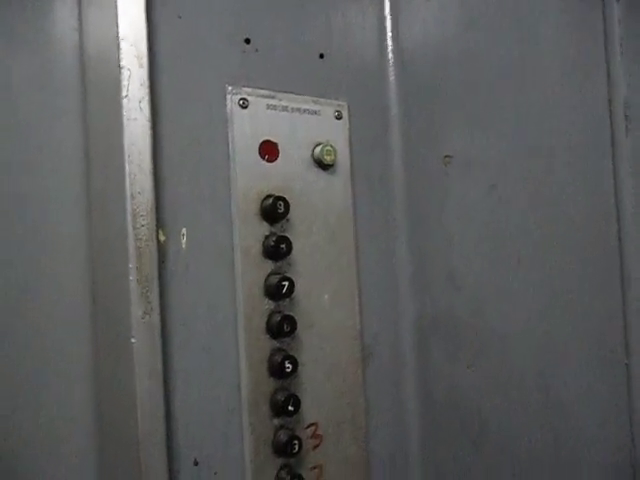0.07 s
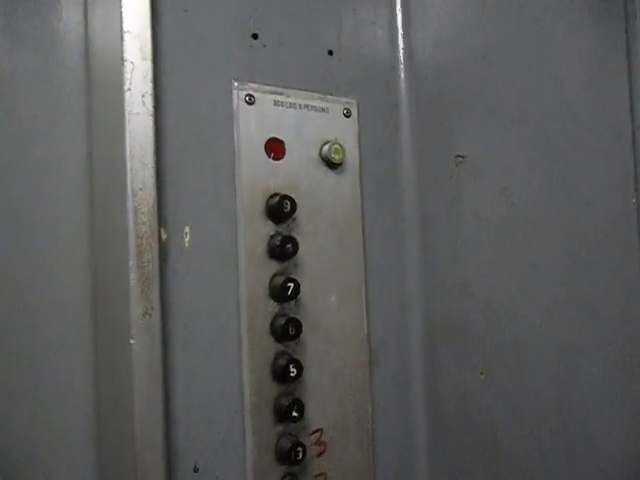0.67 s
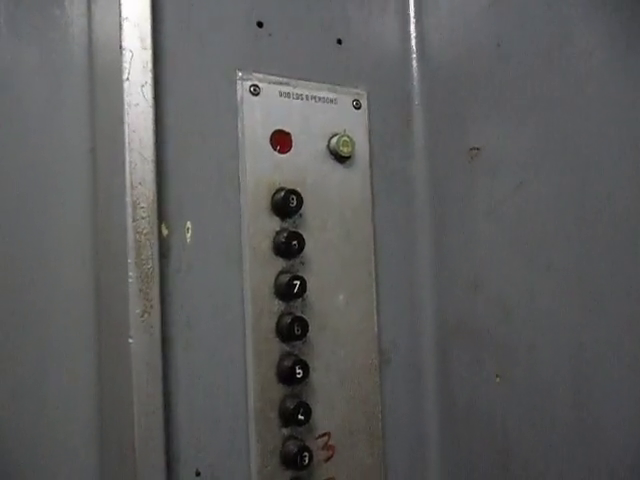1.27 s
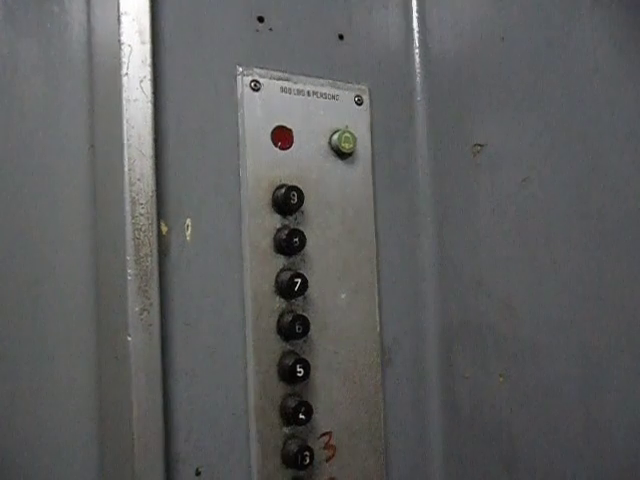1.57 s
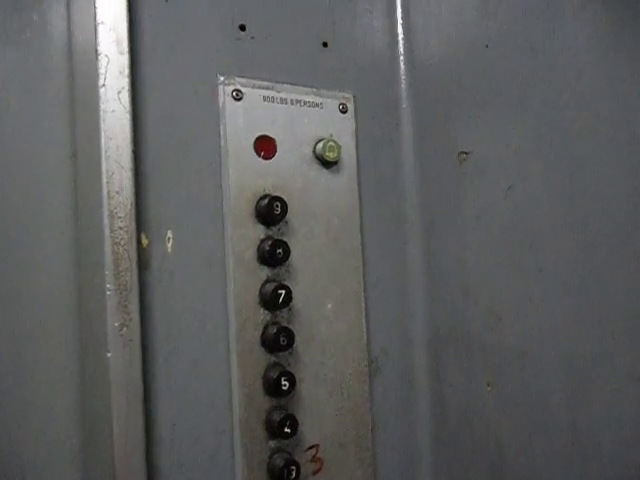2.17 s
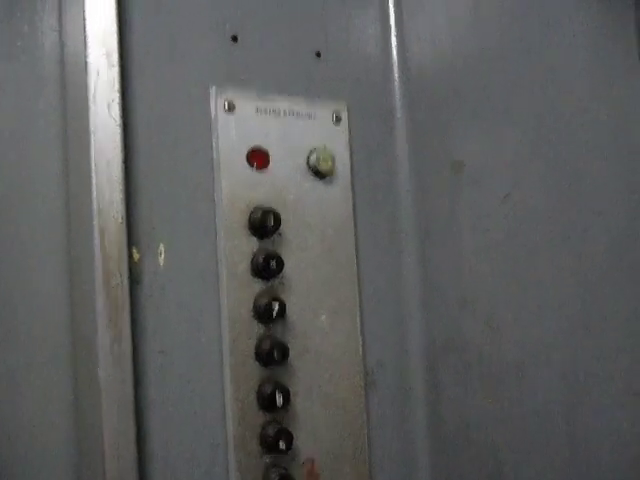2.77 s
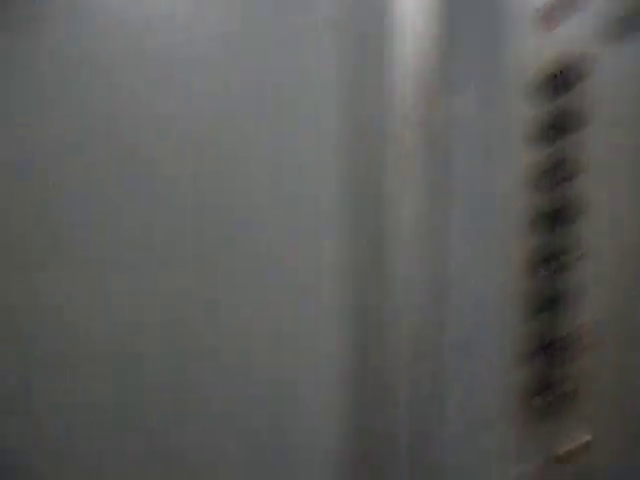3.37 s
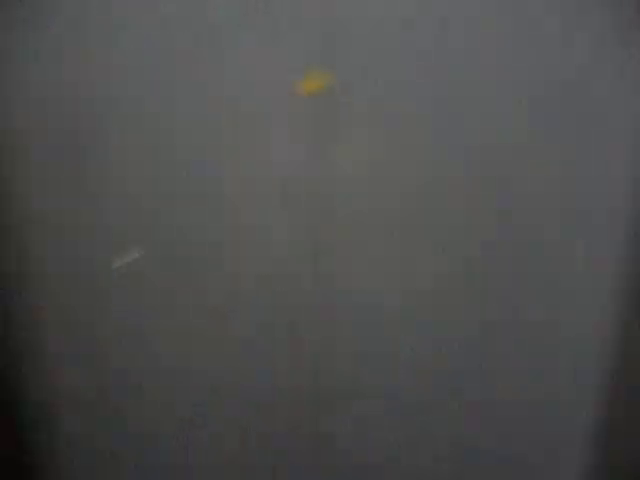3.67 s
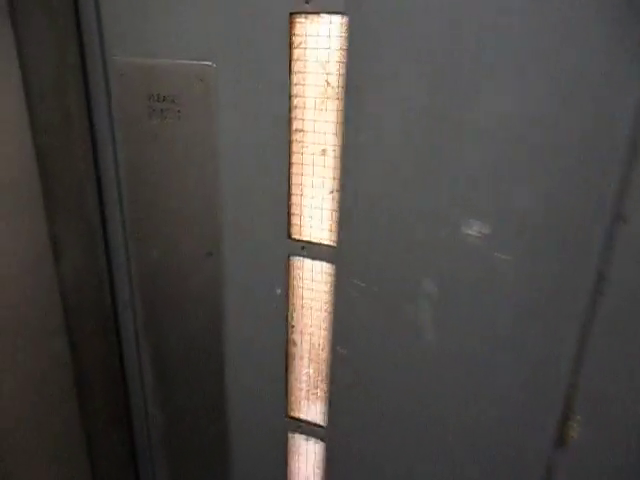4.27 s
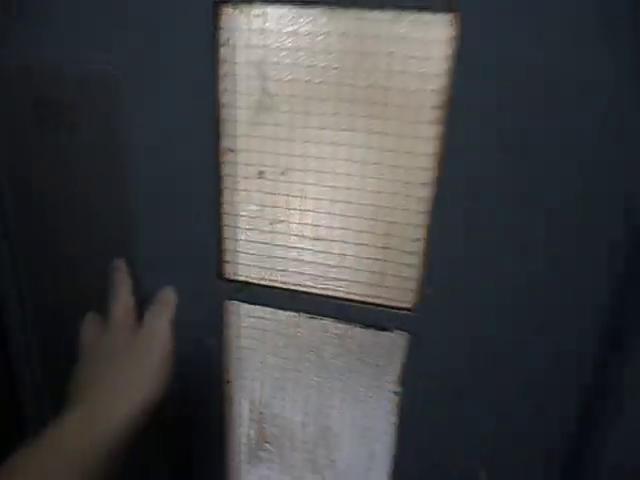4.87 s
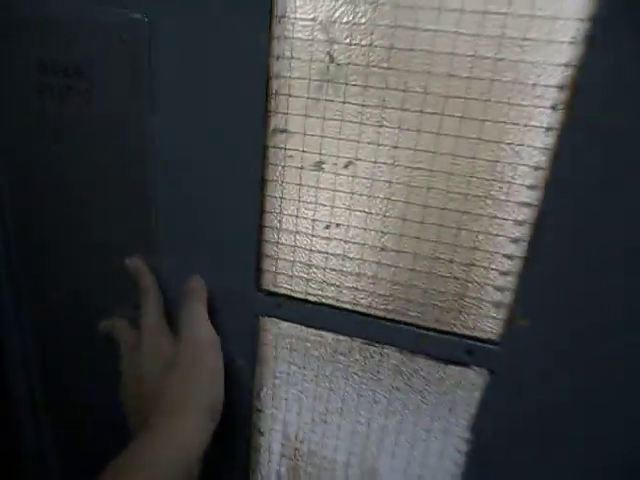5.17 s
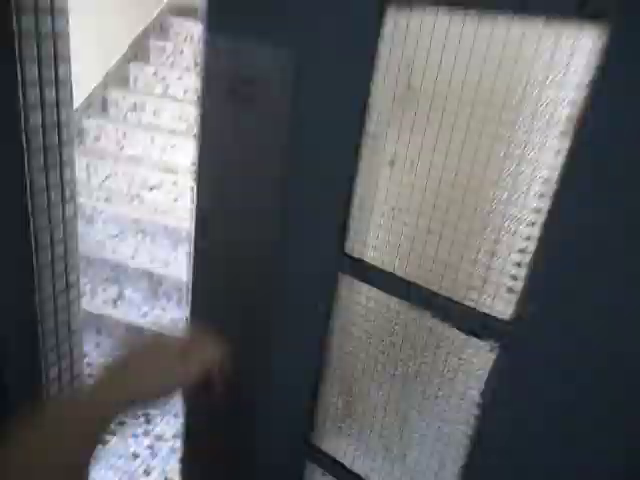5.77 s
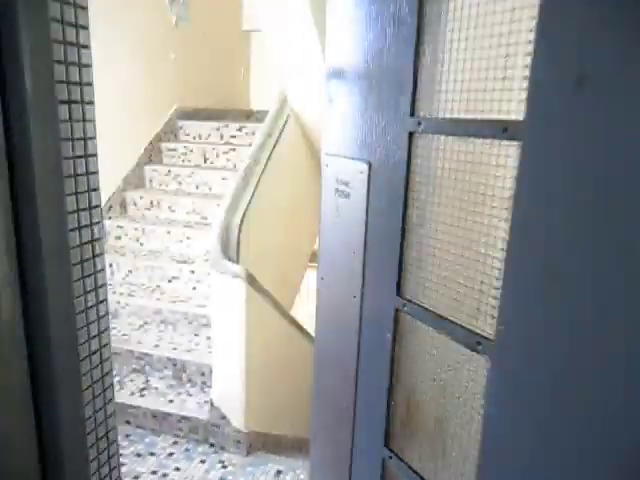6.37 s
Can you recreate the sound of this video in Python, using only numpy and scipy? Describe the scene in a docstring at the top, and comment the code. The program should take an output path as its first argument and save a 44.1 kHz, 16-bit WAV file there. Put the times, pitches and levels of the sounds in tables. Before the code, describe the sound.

Inside a narrow old steel lift, a distant motor hums low and wavering over a soft rush of air. The car stops with a dull bump and small metallic clinks. The inner door rolls open, rumbling and rattling louder, with knocks and a ringing ping. Then the outer door's catch lets go with a sharp, booming clack and the door shudders open onto a stairwell. A small microphone hears it closely from mid-cabin.

```python
"""The inner door of an old steel lift rolls open at close range, heard from the middle of the cabin.
First the winding motor hums, the car stops and the door gear unlocks with small clinks. Rollers then
bump along the worn track, shaking panels and loose fittings, and the run ends with a ping. The outer
door's catch lets go with a sharp clack and its leaf shudders open on the air of a stairwell.
The narrow cabin booms at its resonances; one small microphone dulls the highest treble."""
import sys
import numpy as np
from scipy import signal
from scipy.fft import rfft, irfft, next_fast_len
from scipy.io import wavfile
from scipy.ndimage import map_coordinates

SR = 44100
rng = np.random.default_rng(int(sys.argv[2]) if len(sys.argv) > 2 else 0)


def put_to_file(sound):
    """Save the sound as 16-bit audio at rate SR, in the file named by the first command-line argument."""
    columns = np.atleast_2d(sound).T  # one column per channel
    safe = np.clip(columns, -1, 1)
    whole_steps = np.round(safe * 32767)
    wavfile.write(sys.argv[1], SR, whole_steps.astype(np.int16))


N = 287532
TIME = np.arange(N) / SR

# spectrum of loose fittings chattering: f/Hz, relative level/dB
RATTLE_SPECTRUM = [(300, -47.5), (700, 5.5), (1100, -2), (1800, -5.5), (2300, -8.5), (2900, -9.5),
                   (4000, -16), (7500, -22), (11000, -48)]
# spectrum of the bright edge of a blow on steel: f/Hz, relative level/dB
EDGE_SPECTRUM = [(2000, -11), (4000, 0.5), (5700, -4.5), (7300, -3), (9000, -13.5), (11000, -18)]


def moving_doors():
    """The faster a door moves, the more the car sways, the panels drum and loose fittings chatter."""
    # the inner door takes up the load, creeps, runs open and coasts: t/s, speed/dB re fastest
    door_speed = [(2.55, -21.5), (2.78, -14), (3.05, -13.5), (3.35, -13.5), (3.7, -10.5), (4.13, -9.5),
                  (4.35, -2), (4.68, -0.1), (5.12, -8), (5.55, -12.5)]
    # spectra of the swaying car and of panels shaken by the rollers: f/Hz, relative level/dB
    sway_spectrum = [(18, -28), (40, -1.5), (90, -1.5), (130, -8), (250, -61)]
    roller_spectrum = [(70, -49), (135, 3.5), (230, 1.5), (400, -2), (600, -4.5), (900, -13.5),
                       (1600, -38.5), (4000, -44)]
    speed_db, = curves(door_speed)
    running = np.interp(TIME, [2.5, 2.65, 5.55, 5.75], [0, 1, 1, 0])
    inner = running * amp(speed_db + 2.13 * wobble(13))  # rollers catch and slip on the worn track
    # the outer door is shoved and swings out, losing speed
    shove_s, rise_s, slowing_db_per_s = 5.78, 0.078, 48.5
    shove = np.clip((TIME - shove_s) / rise_s + 1, 0, 1)
    outer = shove * amp(-4.5 - slowing_db_per_s * np.maximum(TIME - shove_s, 0))
    # the heavy car follows late; the outer door hangs on the landing, so it shakes the car less
    rocking = np.interp(TIME - .2, TIME, inner) + 0.28 * outer
    sway = amp(-39) * rocking ** 0.84 * in_cabin(rng.standard_normal(N), sway_spectrum)
    rollers = in_cabin(bumps(rate=1000, spread_db=-1), roller_spectrum)
    drumming = amp(-36) * (inner + outer) ** 1.234 * rollers
    contacts = in_cabin(bumps(rate=200, spread_db=10.5), RATTLE_SPECTRUM)
    chatter = unit(sum(loose_fitting() for _ in range(5))) + amp(-11) * contacts
    coasting = amp(-6 * np.maximum(TIME - 4.78, 0))  # no longer pulled, the door chatters less and less
    shaking = coasting * inner ** 1.44 + 0.9 * outer ** 1.44
    return sway + drumming + amp(-44.5) * shaking * chatter


def loose_fitting():
    """One loose fitting buzzes in fits, each tap exciting its own resonances."""
    taps = bumps(rate=70, spread_db=-3) * amp(1.91 * wobble(9))
    body = own_modes(ring(RATTLE_SPECTRUM), depth_db=3.5)
    return unit(signal.fftconvolve(taps, body)[:N])


def knocks():
    """Loose steel parts strike, each around its own pitch, and the cabin rings on."""
    # levers, rollers and door leaves: t/s, level/dB, f/Hz, thud/dB, edge/dB (all levels relative)
    blows = [(2.709, -55, 2700, -9.5, -20), (2.78, -46, 940, -16, -22), (2.873, -51.5, 2540, -14.5, -7.5),
             (3.035, -51.5, 2770, 12, -17), (3.203, -40, 880, -3, -29), (3.224, -38.5, 910, -1, -22),
             (3.431, -39.5, 1600, -13, -16.5), (3.602, -43, 1170, 6, -24), (3.758, -48, 890, 13, -27),
             (3.96, -43.5, 1490, 4.5, -20.5), (4.172, -37, 2230, -13, -12), (4.241, -47, 3160, -4, -6),
             (4.284, -37, 2000, -8, -14), (4.34, -35.5, 1680, 7.5, -17.5), (4.451, -34.5, 2200, -22, -26),
             (4.507, -23, 806, -6, -19.5), (4.591, -29.5, 3000, 5, -14.5), (4.625, -24.5, 1590, -2, -23),
             (4.696, -30.5, 1450, -13.5, -27), (4.755, -31, 690, -14.5, -36), (4.814, -31.5, 650, 4, -16.5),
             (4.929, -37, 1140, -18, -26), (4.999, -35.5, 1112, 0, -17.5), (5.19, -44, 1150, -12, -35.5),
             (5.273, -44, 745, -6, -14), (5.76, -34.5, 850, 0.5, -29), (5.95, -45.5, 920, 7.5, -30)]
    # spectra of struck sheet steel and of the thud beneath it: f/Hz, relative level/dB
    sheet_spectrum = [(250, -29), (750, 1), (1300, 3), (1900, -2), (2300, -4), (3100, -2), (4000, -18),
                      (7000, -48.5)]
    thud_spectrum = [(60, -15), (150, 1), (450, -6), (800, -14), (2000, -68)]
    track, t = np.zeros(N), np.arange(SR // 2) / SR
    contact = (1 - np.exp(-t / .0045)) * (1 + .6 / (1 + (t / .028) ** 4))
    grid_hz = np.geomspace(100, 10000, 60)
    boost_db, half_width_octaves = 10, 0.35  # the struck part's broad resonance
    for s, db, hz, thud_db, edge_db in blows:
        resonance_db = boost_db / (1 + (np.log2(grid_hz / hz) / half_width_octaves) ** 2)
        part = ring(np.column_stack([grid_hz, along(sheet_spectrum, grid_hz) + resonance_db]))
        steel = own_modes(part + amp(edge_db + 5) * ring(EDGE_SPECTRUM), depth_db=2.5)
        thud = amp(thud_db + 2.5) * ring(thud_spectrum)
        add(track, s, amp(db - 12.5) * contact * (steel + thud))
    return track


def pings():
    """Struck steel parts ring clear: a rough instant of contact, then a tone blurred by the walls."""
    # ringing parts: t/s, f/Hz, level/dB
    strikes = [(3.118, 5222, -54), (3.118, 2778, -62), (3.435, 3280, -55.5), (4.965, 650, -44),
               (5.007, 2890, -41.5), (5.765, 453, -38.5), (5.8, 327, -38)]
    track, t = np.zeros(N), np.arange(SR // 2) / SR

    def scatter(rate):
        """Random drift of level and phase, rate knots a second."""
        knots = rng.standard_normal((2, 512))
        return [1, 1j] @ np.array([map_coordinates(row, [t * rate], mode="mirror") for row in knots])

    for s, hz, db in strikes:
        t60 = 0.243 * (hz / 1000) ** -0.24  # higher parts die sooner
        blur = .7 + .5 * scatter(.045 * hz)
        roughness = .7 * np.exp(-t / .012) * scatter(.16 * hz)
        envelope = amp(db - 60 * t / t60) * (1 - np.exp(-t / 0.001))
        add(track, s, envelope * np.real((blur + roughness) * np.exp(2j * np.pi * hz * t)))
    return track


def outer_door_catch():
    """The catch snaps close to the microphone and sets the heavy leaf booming."""
    # clacks of catch and hinge: t/s, snap/dB, leaf/dB, edge/dB (all levels relative)
    clacks = [(5.572, -34, -8, -70), (6.317, -59.5, -28, -60.5)]
    # spectrum of the snap: f/Hz, relative level/dB
    catch_spectrum = [(100, -13), (350, 3), (600, 3.5), (1100, -5), (1500, 2.5), (2000, 3.5), (2600, -2.5),
                      (4500, -6.5), (6000, -13.5), (9000, -12.5), (12000, -22.5)]
    # modes of the door leaf: f/Hz, relative level/dB, t60/s
    leaf_modes = [(150.3, -36.5, 0.56), (175.4, -40, 0.95), (276.2, -45.5, 1)]
    track, t = np.zeros(N), np.arange(SR // 2) / SR
    leaf = sum(amp(db - 60 * t / t60) * np.sin(2 * np.pi * hz * t) for hz, db, t60 in leaf_modes)
    leaf *= 1 - np.exp(-t / 0.0044)
    direct = 1.58 + np.exp(-t / 0.0038)  # the first milliseconds stand above the cabin's answer
    for s, snap_db, leaf_db, edge_db in clacks:
        snap = amp(snap_db - 5.5) * ring(catch_spectrum) + amp(edge_db) * ring(EDGE_SPECTRUM)
        add(track, s, direct * snap + amp(leaf_db + 10) * leaf)
    return track


def winding_motor():
    """The distant motor's tones reach the cabin through the ropes, swelling and wavering."""
    # tones of the hum: f/Hz, relative level/dB, unsteadiness/0-1
    hum_tones = [(35.6, -59, 0.58), (95.7, -61, 0.95), (111.8, -63, 0.57), (193, -60.5, 0.66)]
    # the hum swells and dies away: t/s, relative level/dB
    hum_level = [(0, -4.5), (.7, -6.5), (1.2, -0.5), (1.7, -6.5), (2.5, -2), (3.1, 6), (3.4, -1),
                 (4.0, -37)]
    level_db, = curves(hum_level)
    hum = np.zeros(N)
    for hz, db, unsteadiness in hum_tones:
        waver = 1 + unsteadiness * (wobble(12) + 1j * wobble(14))
        hum += amp(db) * np.real(waver * np.exp(2j * np.pi * hz * TIME))
    return amp(level_db + 4) * hum


def arriving_car():
    """The car squeaks faintly along its guides, then bounces on the ropes as it stops."""
    # a guide shoe rubs on its rail: t/s, level/dB
    squeaks = [(.16, -70), (.41, -73), (.68, -75), (.9, -72)]
    rubbing = sum(amp(db) * np.exp(-((TIME - s) / 0.031) ** 2) for s, db in squeaks)
    squeak = rubbing * np.sin(2 * np.pi * 3850 * TIME + 0.55 * wobble(90.8))
    bounce = amp(-39) * np.exp(-((TIME - 2.9) / 0.1) ** 2) * np.sin(2 * np.pi * 38 * TIME)
    return squeak + bounce


def room_tone():
    """Shaft air, a thin electric whine, and the stairwell coming in as the outer door opens."""
    # spectra of the air in the shaft and in the stairwell: f/Hz, relative level/dB
    shaft_spectrum = [(12, -49), (20, 8.5), (64, -7.5), (104, -0.5), (147, -12.5), (197, -4.5), (257, -8.5),
                      (585, -14), (705, -18.5), (1270, -20.5), (1480, -23), (6080, -31), (7320, -32),
                      (10100, -33.5), (11500, -34), (15000, -86.5), (22000, -120)]
    stairwell_spectrum = [(18, -33.5), (30, -5.5), (52, 2.5), (70, -14.5), (104, -1.5), (205, -10.5),
                          (456, -11), (657, -13), (10000, -45), (13000, -68.5), (22000, -120)]
    shaft = amp(-56 + 0.29 * wobble(5.11)) * hiss(shaft_spectrum)
    whine = amp(-81) * np.sin(2 * np.pi * 7138 * TIME + .3 * wobble(22))
    opening = np.clip((TIME - 5.6) / .5, 0, 1)
    return shaft + whine + opening * amp(-51 + wobble(10)) * hiss(stairwell_spectrum)


def in_cabin(x, spectrum):
    """x with a source's colour, boosted at the cabin's resonances, at rms 1."""
    # standing waves and wall panels: f/Hz, width/Hz, boost/dB
    resonances = [(44.6, 26, 13), (85.4, 16.5, 13.5), (136.5, 33.7, 8.5), (176.07, 11, 7.5), (252, 3.5, 12),
                  (326.7, 39, 7.5), (398.7, 34, 8), (466.5, 30, 11), (605.2, 38, 4), (691, 15, 4.5),
                  (894, 26, 6), (1070, 92, 3.5), (1230, 46, 1)]
    boost_db = lambda hz: sum(db / (1 + (2 * (hz - f) / width) ** 2) for f, width, db in resonances)
    return unit(filtered(x, lambda hz: amp(along(spectrum, hz) + boost_db(hz))))


def ring(spectrum):
    """Dense modes of the steel walls after one blow; the treble dies first."""
    # the cabin's decay: f/Hz, t60/s
    ring_times = [(60, 0.53), (200, 0.955), (600, 0.598), (1500, 0.337), (3500, 0.23), (9000, 0.14)]
    hz, t, bands = signal.stft(in_cabin(rng.standard_normal(SR // 2), spectrum), SR, nperseg=256)
    decay = amp(-60 * t / along(ring_times, hz)[:, None])
    return signal.istft(bands * decay, SR, nperseg=256)[1][:SR // 2]


def own_modes(x, depth_db, spacing_hz=110):
    """x through one part's own uneven set of resonances."""
    ripple = rng.standard_normal(1024)
    return filtered(x, lambda hz: amp(depth_db * map_coordinates(ripple, [hz / spacing_hz])))


def bumps(rate, spread_db):
    """Tiny contacts of uneven strength at random moments, about rate a second."""
    hits = (rng.random(N) < rate / SR) * rng.choice([-1, 1], N)
    return unit(hits * amp(spread_db * np.clip(rng.standard_normal(N), -2, 2)))


def hiss(spectrum):
    """Steady coloured noise at rms 1."""
    return unit(filtered(rng.standard_normal(N), lambda hz: amp(along(spectrum, hz))))


def wobble(rate):
    """A smooth random curve, rate knots a second."""
    return map_coordinates(rng.standard_normal(int(N * rate / SR) + 4), [TIME * rate])


def filtered(x, response):
    """x through a gain that depends on frequency."""
    m = next_fast_len(len(x) + SR // 4)
    return irfft(rfft(x, m) * response(np.fft.rfftfreq(m, 1 / SR)), m)[:len(x)]


def along(points, hz):
    """Interpolate (f/Hz, value) points on a log frequency axis."""
    f, v = np.transpose(points)
    return np.interp(np.log(hz + 1), np.log(f + 1), v)


def curves(rows):
    """One value per sample for each column after the time."""
    s, *cols = np.transpose(rows)
    return [np.interp(TIME, s, c) for c in cols]


def amp(db):
    """Decibels to gain."""
    return 10 ** (np.asarray(db) / 20)


def unit(x):
    """x at rms 1."""
    return x / np.sqrt(np.mean(x ** 2) + 1e-20)


def add(track, s, sound):
    """Mix a sound into the track at time s."""
    part = track[max(0, round(s * SR)):][:len(sound)]
    part += sound[:len(part)]


def scene():
    """Everything as heard from the middle of the cabin, in mono."""
    background = winding_motor() + arriving_car() + room_tone()
    return (background + moving_doors() + knocks() + pings() + outer_door_catch())[None]


def record(dry):
    """A small microphone that falls away above 10 kHz."""
    # microphone response: f/Hz, level/dB
    mic_response = [(10000, -0.5), (10400, -3), (11000, -16.5), (12000, -14.5)]
    cutoff_hz = 11951
    return np.array([filtered(x, lambda hz: amp(along(mic_response, hz)) * (hz < cutoff_hz)) for x in dry])


dry = scene()
out = record(dry)
put_to_file(out)
```